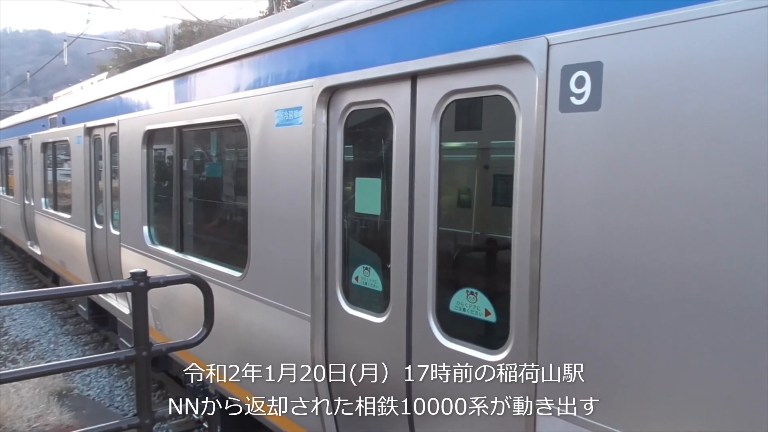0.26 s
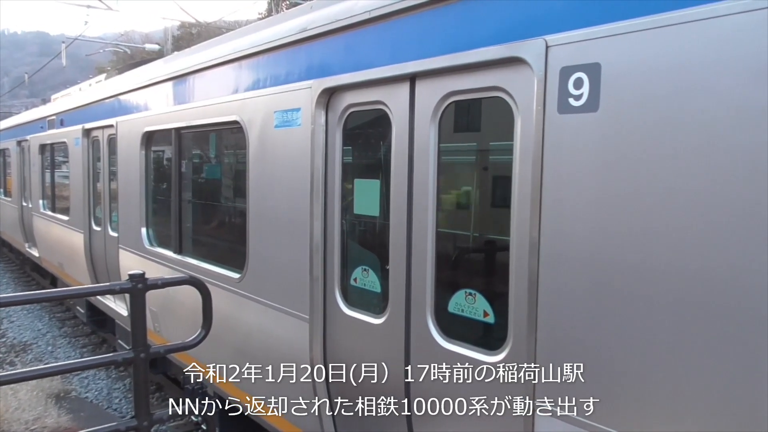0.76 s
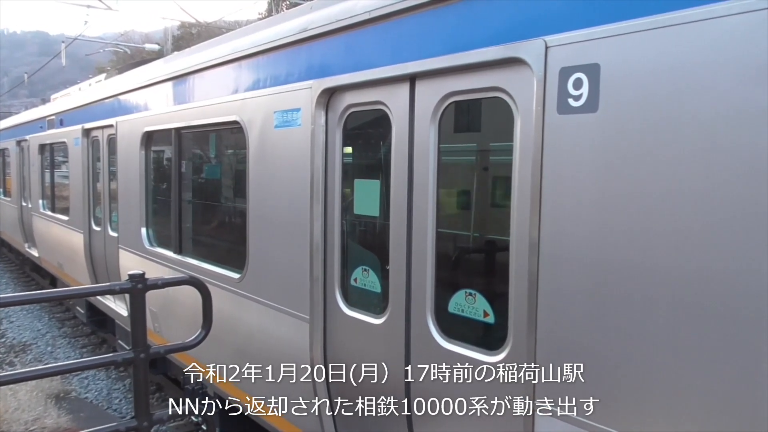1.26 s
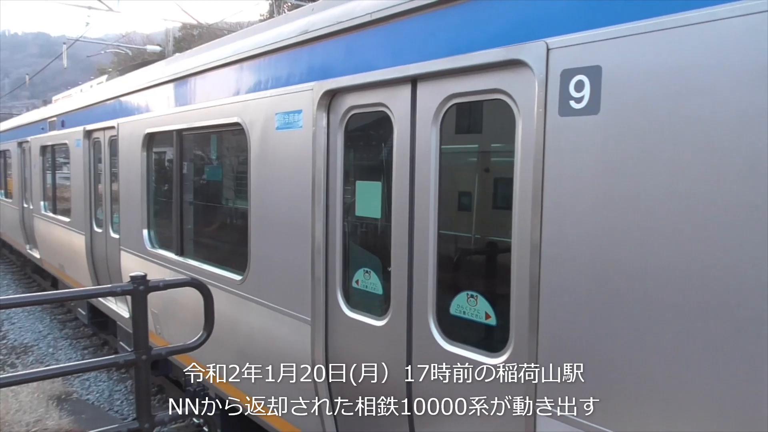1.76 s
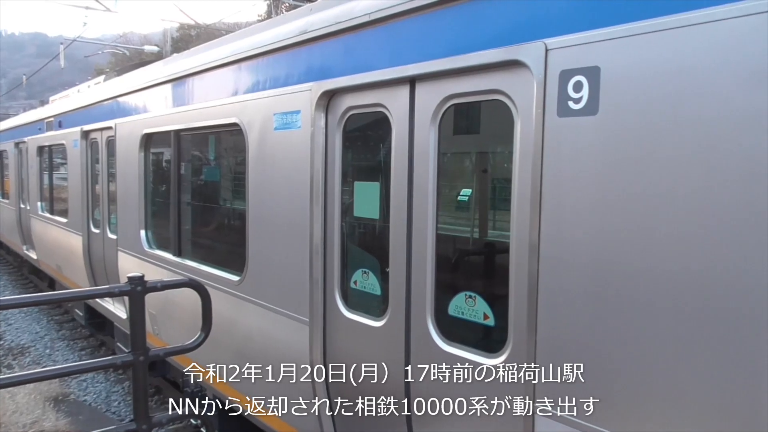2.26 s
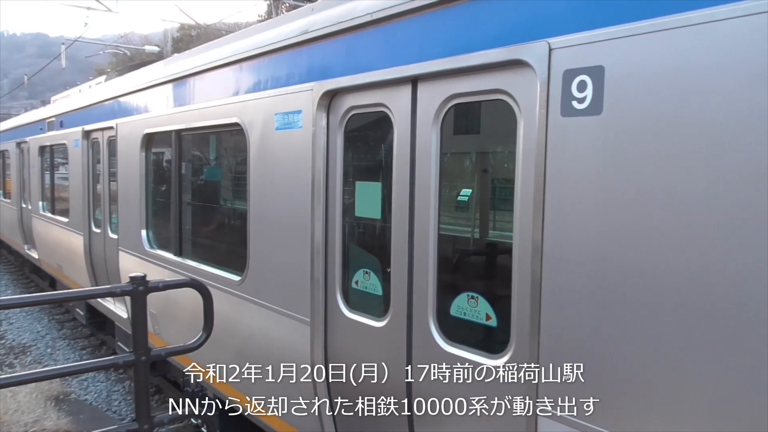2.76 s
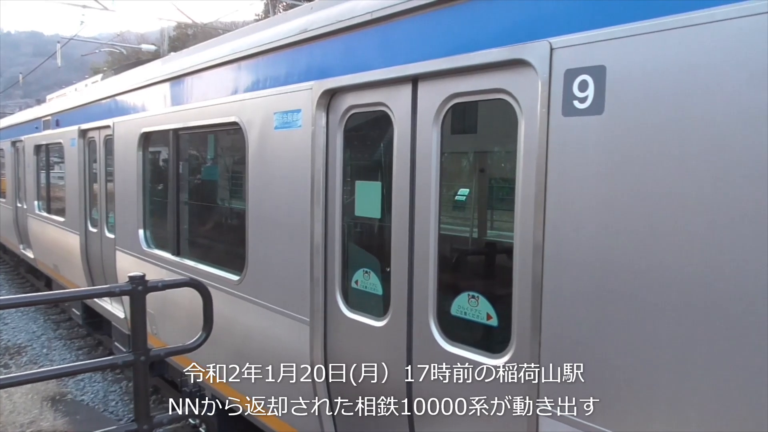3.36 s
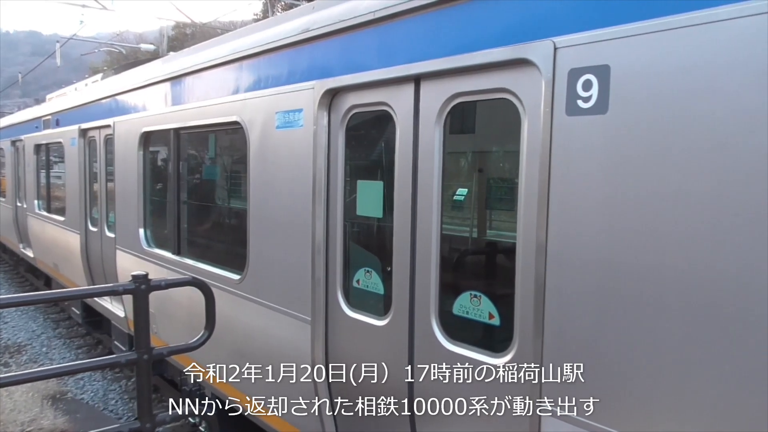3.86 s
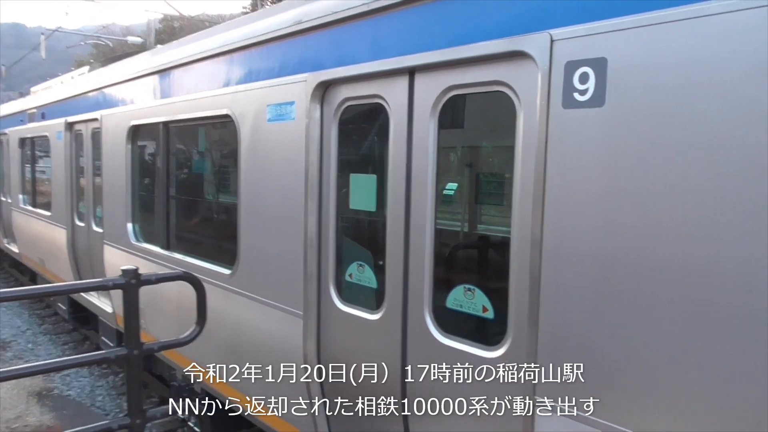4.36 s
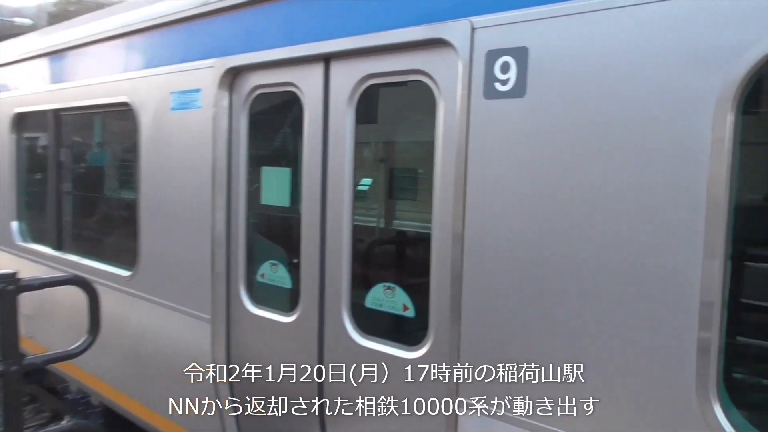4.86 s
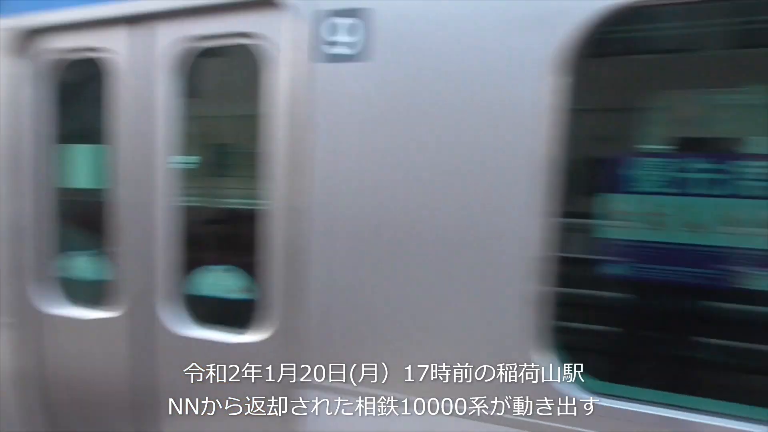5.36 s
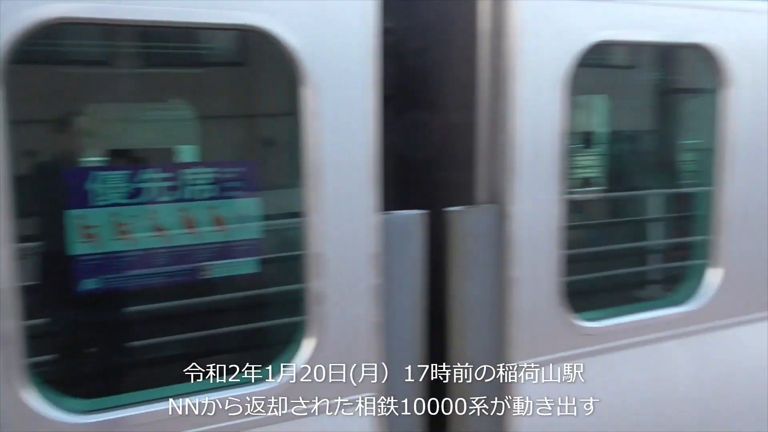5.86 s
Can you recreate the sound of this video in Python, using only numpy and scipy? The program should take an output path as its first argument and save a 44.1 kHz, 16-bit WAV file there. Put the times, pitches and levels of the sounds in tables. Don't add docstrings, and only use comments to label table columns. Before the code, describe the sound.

Heavy wheel blows and loose metal clatter hammer past a platform over deep rolling rumble, thinning to duller, more distant knocks.

```python
import sys
import numpy as np
from scipy import signal
from scipy.fft import rfft, irfft, next_fast_len
from scipy.io import wavfile
from scipy.ndimage import uniform_filter1d

SR = 44100
rng = np.random.default_rng(int(sys.argv[2]) if len(sys.argv) > 2 else 0)


def gain_from_db(level_db):
    decades = np.asarray(level_db, float) / 20
    return 10 ** decades


def generate_wav(signal):
    frames = np.transpose(np.atleast_2d(signal))
    scaled = np.clip(frames, -1, 1) * 32767
    pcm = np.round(scaled).astype(np.int16)
    wavfile.write(sys.argv[1], SR, pcm)


N = 269010

# start_s, distance_gain_db, flange_rub_db
RECEDING_TRAIN = [(0.0, 5.5, -45.5), (0.15, -1.5, -47.5), (0.6, 2.9, -50.5), (1.14, -1, -51),
                  (1.24, 2.5, -51.5), (1.4, -3.5, -51), (1.65, -3.5, -54.5), (2.02, 0, -51),
                  (2.46, -1.5, -53.5), (2.77, -9.5, -53), (3.26, -4.5, -55), (3.6, -8, -56),
                  (3.9, -11.5, -55.5), (4.43, -10, -57.5), (4.81, -7.5, -57.5), (5.06, -11.5, -66),
                  (5.44, -10.5, -65.5), (6.1, -11, -63.5)]
# frequency_hz, density_db (per Hz)
RUMBLE_SPECTRUM = [(53, -30), (90, -8.5), (124, -3.5), (263, 3.5), (355, 2), (440, -4.5), (563, -8),
                   (600, -14.5), (780, -70), (1320, -120)]
DRONE_SPECTRUM = [(22, -22), (35, -8), (48, -9), (62, -2.5), (75, 4), (92, -9.5), (125, -5), (150, -37)]
ROAR_SPECTRUM = [(250, -16), (420, -10.5), (566, -3.5), (623, -3.5), (736, -6), (1360, -18.5),
                 (1770, -32.5), (2200, -39), (2860, -40), (4840, -120)]
HISS_SPECTRUM = [(1100, -29), (1600, -4), (2200, -2.5), (3000, -3.5), (4000, -0.5), (6200, -5.5),
                 (7500, -3), (9200, -4.5), (11500, -2), (13300, -8.5), (14100, -13), (14600, -21),
                 (14900, -15), (15550, -19)]
AIR_SPECTRUM = [(1100, -20), (1500, 0), (2500, -6), (4500, -14), (6500, -22), (8000, -21), (10300, -18),
                (12500, -30), (15500, -29)]
# frequency_hz, density_db (per Hz)
GEAR_SPECTRUM = [(800, -20), (1100, 3.5), (1600, 1), (1900, -4), (2200, -0.5), (2600, -4.5), (3500, -4),
                 (5500, -4.5), (8000, -0.5), (11000, -5), (13500, -24), (15200, -30)]
# pitch_hz, width_hz, level_db (re its layer)
RAIL_SONG = [(368, 16, -9), (298, 24, -12)]
MOTOR_HUM = [(75, 12, -4)]
WHEEL_WHINE = [(2190, 50, -17), (2900, 60, -21), (8080, 50, -27), (13500, 40, -30), (14840, 30, -29),
               (14970, 30, -30)]
# start_s, level_db
BALLAST_THUDS = [(0.15, -28.5), (0.61, -30.5), (1.07, -44), (1.24, -36), (1.44, -30.5), (1.72, -31.5),
                 (1.88, -35), (2.02, -38), (2.14, -45), (2.38, -36.5), (2.55, -32), (2.77, -30),
                 (2.95, -35), (3.16, -41), (3.36, -34), (3.68, -43), (3.79, -40.5), (3.97, -39),
                 (4.18, -39), (4.43, -38), (4.64, -37), (4.86, -47), (5.08, -42), (5.49, -48), (5.69, -42),
                 (6.09, -48)]
# pitch_hz, level_db, t60_s
TRACK_MODES = [(150.2, -18.5, 0.056), (188, -10, 0.083), (250, -5.5, 0.069), (300.3, -11.5, 0.13),
               (372.2, -15, 0.13), (409.4, -7.5, 0.038)]
# pitch_hz, level_db, t60_s
WEB_MODES = [(491.2, -2, 0.15), (600, 1.5, 0.045), (691, -1, 0.072), (790, -2.5, 0.045), (917, 3, 0.041),
             (1067, -8.5, 0.046), (1274, -13.5, 0.034), (1450, -15.5, 0.036), (1640, -38, 0.058),
             (2160, -21.5, 0.076)]
# start_s, peak_db, hollow_pitch_hz, rebound_gap_s, rebounds_db (re peak)
LEADING_AXLES = [
    (0.199, -1, 314, 0.024, -6.5),
    (0.818, 2, 313, .035, -4.5),
    (2.119, 0, 326, .030, -4),
]
TRAILING_AXLES = [
    (0.4, 1, 290, .027, -18.5),
    (1.019, -1, 318.4, 0.023, -5.5),
    (2.316, 0, 321, .031, -9),
]
# delay_gaps, level_db (re rebounds), pitch_ratio, knock_db (re touch), t60_s
LEADING_REBOUNDS = [
    (0.999, -1.5, .85, -15, 0.092),
    (1.898, -5, 0.996, -18, 0.039),
    (3.302, -14, 1.2, -11, .1),
]
TRAILING_REBOUNDS = [
    (1.0, 2.5, 1, -19, 0.045),
    (1.802, -1.1, 1.113, -12.5, 0.11),
    (2.5, -6, 1.2, -16.5, 0.17),
]
# start_s, peak_db, hollow_pitch_hz, rebound_gap_s, first_rebound_db (re peak)
FAR_AXLES = [(0.6, -9, 180, .014, -2.5), (1.268, -16.5, 273, 0.024, -12), (1.417, -9.5, 214, 0.031, 0),
             (1.682, -8.5, 165, 0.023, -2), (1.877, -10.5, 183, 0.032, 0), (2.518, -11.5, 232, 0.031, 4.5),
             (2.722, -11, 305, 0.04, -1), (3.139, -12, 224, .022, 2.5), (3.342, -10.5, 191, .032, 1.7),
             (3.958, -25.5, 260, 0.035, 5), (4.155, -22.5, 214, .023, 1.5), (4.434, -11.5, 225, 0.028, .4),
             (4.634, -6.5, 208, .021, -1.5), (5.457, -19.5, 241, 0.02, 0.5), (5.666, -23, 209, 0.031, -3)]
# delay_gaps, level_db (re first rebound), pitch_hz, t60_s
FAR_REBOUNDS = [
    (1.001, -0.5, 266.3, 0.054),
    (2.1, -7.5, 349, 0.07),
]
# start_s, peak_db, pitch_hz, knock_db (re peak)
RAIL_ENDS = [
    (0.376, -11.5, 197, -20),
    (0.79, -14, 254, -22),
    (1.004, -14, 330, -11.5),
    (2.099, -10, 295, -17),
    (2.299, -11, 292, -18),
]
# start_s, peak_db, pitch_hz, knock_db (re peak)
STRAY_KNOCKS = [(0.13, -24, 310, -4), (1.109, -17, 367, -10.5), (1.175, -11, 382, -21),
                (1.318, -17, 363, -35), (1.639, -22, 290, -17), (1.738, -19.5, 336, -19),
                (2.649, -21, 170, -13.5), (2.942, -27, 370, -8.5), (2.985, -22.5, 350, -24),
                (3.548, -28.5, 340, -8), (3.741, -23, 215, -32), (4.515, -15.5, 336, -19),
                (4.55, -20.5, 363, -29), (4.598, -29, 368, 0), (4.696, -18.5, 250, -15),
                (4.721, -17.5, 270, -16.5), (4.87, -32, 296, -10), (5.266, -27, 260, -11),
                (5.899, -22.5, 236, -12), (6.081, -19, 212, -14)]
# start_s, level_db
DULL_RATTLE = [
    (0.134, -32),
    (0.164, -28),
    (4.68, -43),
]
# start_s, length_s, pitch_hz, width_hz, level_db
SQUEAKS = [(.49, .06, 4000, 300, -55), (1.06, .21, 2400, 90, -59), (2.402, .12, 2900, 200, -61),
           (2.8, .4, 3900, 500, -64), (2.677, .062, 2900, 110, -58.5), (2.6, .26, 2150, 120, -67),
           (3.2, .12, 4000, 600, -62), (3.27, .1, 2420, 120, -60), (3.38, .06, 3300, 200, -63),
           (3.49, .12, 2300, 150, -60), (3.63, .067, 2150, 120, -65), (3.95, .37, 3550, 250, -64),
           (3.96, .2, 4400, 1600, -59.5), (5.455, .055, 570, 60, -35), (4.585, .13, 800, 380, -35),
           (4.15, .25, 3900, 1200, -62), (4.65, .3, 4000, 1800, -63)]
# frequency_hz, likeness (0 to 1)
PORT_LIKENESS = [(30, .88), (70, .97), (300, .96), (640, .8), (1400, .6), (2800, .42), (5000, .36),
                 (9000, .52), (15000, .3)]
# frequency_hz, lead_rad
PORT_LEAD = [(30, -1.05), (70, -.85), (150, -.62), (520, -.6), (1460, -.3), (2840, -.5), (3450, -1.0),
             (6980, -1.7), (8350, -2.8), (10100, -3.6), (14500, -6.4)]
# frequency_hz, tilt_db
PORT_TILT = [(30, 3.5), (70, 2), (150, -.3), (300, -.4), (600, -3.9), (1200, -4.8), (2400, -4), (5000, -1),
             (9000, -.7), (14000, -4.5)]

NEAR_RISE_S, FAR_RISE_S = 0.0016, 0.0036


def unit_rms(x):
    return x / np.sqrt(np.mean(x ** 2) + 1e-20)


def at_hz(points, hz):
    point_hz, value = np.transpose(points)
    return np.interp(np.log(hz + 1e-9), np.log(point_hz), value)


def drift(rate_hz):
    r = np.exp(-80 * np.pi * rate_hz / SR)
    slow = signal.lfilter([1], [1, -2 * r, r * r], rng.standard_normal(N // 40 + 2002))
    slow = unit_rms(slow[2000:])
    return np.interp(np.arange(N) / 40, np.arange(len(slow)), slow)


def coloured(spectrum, patchy_db, rate_hz, song=()):
    size = next_fast_len(N)
    hz = np.fft.rfftfreq(size, 1 / SR)
    white = rfft(rng.standard_normal((2, size)))
    lowest_hz, highest_hz = spectrum[0][0], spectrum[-1][0]
    power = gain_from_db(at_hz(spectrum, hz)) ** 2 * (hz > lowest_hz) * (hz < highest_hz)
    total = power.sum()
    for pitch_hz, width_hz, level_db in song:
        bump = 1 / (1 + (2 * (hz - pitch_hz) / width_hz) ** 2) ** 2
        power = power + gain_from_db(level_db) ** 2 * total * bump / bump.sum()
    out, together = 0, drift(rate_hz)
    place = 1.5 * np.log2((hz + 1) / lowest_hz)
    for k in range(int(1.5 * np.log2(highest_hz / lowest_hz)) + 2):
        patch = np.sqrt(np.clip(1 - abs(place - k), 0, 1) * power)
        flicker = gain_from_db(patchy_db * (0.74 * together + drift(rate_hz)))
        out = out + flicker * irfft(white * patch, size)[:, :N]
    return unit_rms(out)


def evened(x, window_s):
    power = uniform_filter1d(np.mean(x ** 2, axis=0), int(window_s * SR))
    return x / np.sqrt(power + 0.12)


def swells(rows, rise_s, fall_s):
    coarse = np.arange(0, N, 64)
    start_s, level_db = np.transpose(rows)[:, :, None]
    t = coarse / SR - start_s
    power = gain_from_db(level_db) ** 2 * np.exp(np.where(t < 0, t / rise_s, -t / fall_s))
    return np.interp(np.arange(N), coarse, power.sum(axis=0))


def rolling():
    start_s, *controls = np.transpose(RECEDING_TRAIN)
    distance_db, rub_db = [np.interp(np.arange(N) / SR, start_s, c) for c in controls]
    load_rise_s, load_fall_s = 0.026, 0.068
    near_rows = [(s + load_rise_s, db) for s, db, *_ in LEADING_AXLES + TRAILING_AXLES]
    far_rows = [(s + gap, db - 6) for s, db, _, gap, _ in FAR_AXLES]
    near_load = swells(near_rows, load_rise_s, load_fall_s)
    far_load = swells(far_rows, load_rise_s, load_fall_s)
    thuds = swells(BALLAST_THUDS, rise_s=0.025, fall_s=0.057)

    rumble = gain_from_db(-24.5 + distance_db)
    drone = np.sqrt(gain_from_db(-40 + 1.3 * distance_db) ** 2 + thuds)
    roar = np.sqrt(gain_from_db(-36 + 0.44 * distance_db) ** 2 + gain_from_db(-33.5) ** 2 * (near_load + far_load))
    hiss = gain_from_db(2.5) * np.sqrt(gain_from_db(rub_db) ** 2 + gain_from_db(-49) ** 2 * near_load)

    out = rumble * coloured(RUMBLE_SPECTRUM, patchy_db=1.0, rate_hz=2.1, song=RAIL_SONG)
    motor = coloured(DRONE_SPECTRUM, patchy_db=1.5, rate_hz=5.0, song=MOTOR_HUM)
    out += drone * evened(motor, window_s=0.086)
    out += roar * coloured(ROAR_SPECTRUM, patchy_db=0.48, rate_hz=18)
    out += hiss * coloured(HISS_SPECTRUM, patchy_db=0.5, rate_hz=6, song=WHEEL_WHINE)
    return out + gain_from_db(-61.1) * coloured(AIR_SPECTRUM, patchy_db=0.3, rate_hz=4)


def touches():
    near, far = [], []
    for axles, rebounds in ((LEADING_AXLES, LEADING_REBOUNDS), (TRAILING_AXLES, TRAILING_REBOUNDS)):
        for s, db, hz, gap, first_db in axles:
            near.append((s, db, hz, -15.5, 0.072, NEAR_RISE_S))
            for late, re_db, ratio, knock_db, t60 in rebounds:
                near.append((s + gap * late, db + first_db + re_db, hz * ratio, knock_db, t60, NEAR_RISE_S))
    for s, db, hz, gap, first_db in FAR_AXLES:
        far.append((s, db, hz, 0.098))
        for late, re_db, rebound_hz, t60 in FAR_REBOUNDS:
            far.append((s + gap * late, db + first_db + re_db, rebound_hz, t60))
    far = [(s, db, hz, -26.5 - 0.52 * db, t60, FAR_RISE_S) for s, db, hz, t60 in far]
    strays = [(*row, 0.088, NEAR_RISE_S) for row in RAIL_ENDS + STRAY_KNOCKS]
    return near + far + strays


def struck(modes, t):
    hz, db, t60 = np.transpose(modes)[:, :, None]
    hz = hz * (1 + 0.054 * rng.standard_normal(hz.shape))
    db = db + rng.normal(0, 0.78, hz.shape)
    return (np.sin(2 * np.pi * hz * t) * gain_from_db(db - 60 * t / t60)).sum(axis=0)


def blows():
    out, t = np.zeros(N + SR), np.arange(SR // 6) / SR
    for s, db, hz, knock_db, t60, rise_s in touches():
        i = int(s * SR)
        onset = 1 - np.exp(-t / rise_s)
        hollow = np.sin(2 * np.pi * hz * t) * onset * gain_from_db(0.5 - 60 * t / max(t60, 0.03))
        out[i:i + len(t)] += gain_from_db(db) * hollow
        chatter = np.zeros(SR // 20)
        late_s = 0.00203 + np.arange(4) * rng.uniform(0.0041, 0.011, 4)
        chatter[(late_s * SR).astype(int)] = rng.choice([-1, 1], 4) * gain_from_db(-327 * late_s)
        for modes, share_db in ((TRACK_MODES, -23), (WEB_MODES, knock_db - 17.5), (WEB_MODES, knock_db - 15.5)):
            steel = signal.fftconvolve(struck(modes, t) * onset, chatter)
            out[i:i + len(steel)] += gain_from_db(db + share_db) * unit_rms(steel)
    return signal.sosfilt(signal.butter(2, [125, 2600], "band", fs=SR, output="sos"), out[:N])


def echoes(x, wet_db, t60):
    t = np.arange(SR // 4) / SR
    smear = rng.standard_normal((2, len(t))) * gain_from_db(-60 * t / t60) * (t > 0.006)
    smear /= np.linalg.norm(smear, axis=1)[:, None]
    wet = signal.fftconvolve(x[None], smear, axes=1)[:, :N]
    return np.array([x + gain_from_db(wet_db) * wet[0], wet[1]])


def shaken():
    jolts = [(s, db, -22) for s, db in DULL_RATTLE]
    for axles, gear_db in ((LEADING_AXLES, -27.5), (TRAILING_AXLES, -26.5)):
        for s, db, _, gap, _ in axles:
            jolts.append((s, db + gear_db, -4))
            jolts.append((s + gap, db + gear_db - 8.5, -7))
    return jolts + [(s, db - 29.5 - 2.5 * s, -7) for s, db, *_ in FAR_AXLES]


def clatter():
    swell, t = np.zeros((2, N)), np.arange(SR // 2) / SR
    joining = np.array([np.ones(len(t)), 1 - np.exp(-t / 0.014)])
    for s, db, bright_db in shaken():
        i = int(s * SR)
        shape = (1 - np.exp(-t / 0.0032)) ** 2 * gain_from_db(db - 3.5 - 60 * t / 0.23)
        swell[:, i:i + len(t)] += (shape * gain_from_db([[0], [bright_db]]) * joining)[:, :N - i]
    ticks = gain_from_db(0.8 * drift(120)) * coloured(GEAR_SPECTRUM, patchy_db=0.6, rate_hz=20)
    dull = signal.sosfiltfilt(signal.butter(3, 4700, fs=SR, output="sos"), ticks)
    return gain_from_db(-3) * swell[0] * unit_rms(dull) + swell[1] * unit_rms(ticks - dull)


def squeaks():
    out = np.zeros((2, N))
    for s, length_s, hz, width_hz, db in SQUEAKS:
        i, size = int(s * SR), int(length_s * SR)
        r = np.exp(-np.pi * width_hz / SR)
        tone = [1, -2 * r * np.cos(2 * np.pi * hz / SR), r * r]
        rub = rng.standard_normal((2, SR // 2))
        for _ in range(2):
            rub = signal.lfilter([1, 0, -1], tone, rub)
        out[:, i:i + size] += gain_from_db(db) * unit_rms(rub[:, -size:]) * np.sqrt(np.hanning(size))
    return out


def two_ports(field):
    size = next_fast_len(N + 4096)
    hz = np.fft.rfftfreq(size, 1 / SR)
    direct, diffuse = rfft(field, size)
    alike = np.clip(at_hz(PORT_LIKENESS, hz), 0, 1)
    port = gain_from_db(at_hz(PORT_TILT, hz) / 2) * np.exp(0.5j * at_hz(PORT_LEAD, hz))
    shared = np.sqrt((1 + alike) / 2) * direct
    own = np.sqrt((1 - alike) / 2) * diffuse
    summed = np.sqrt((1 + alike) * abs(port + 1 / port) ** 2 + (1 - alike) * abs(port - 1 / port) ** 2)
    both = np.array([(shared + own) * port, (shared - own) / port]) * np.sqrt(8) / summed
    return irfft(both, size)[:, :N]


def scene():
    field = rolling() + echoes(blows(), wet_db=-6.0, t60=0.22) + clatter() + squeaks()
    return two_ports(field)


def low_pass(x):
    return signal.sosfilt(signal.butter(12, 15600, fs=SR, output="sos"), x)


def record(dry):
    dry = signal.sosfilt(signal.butter(2, 45, "high", fs=SR, output="sos"), dry)
    mix = np.tanh(dry / 1.068)
    return low_pass(mix)


dry = scene()
out = record(dry)
generate_wav(out)
```